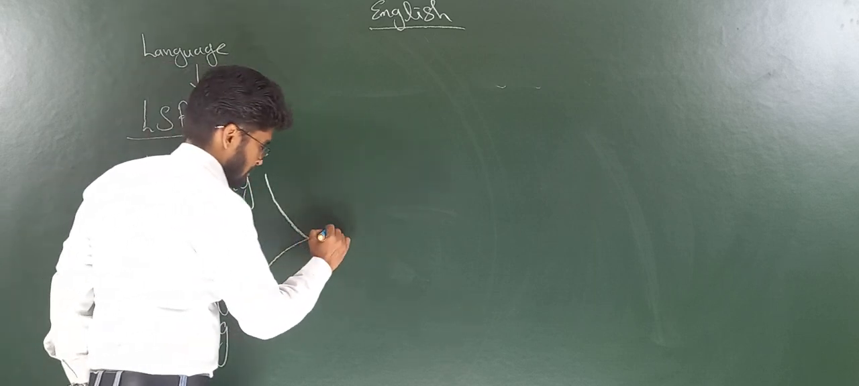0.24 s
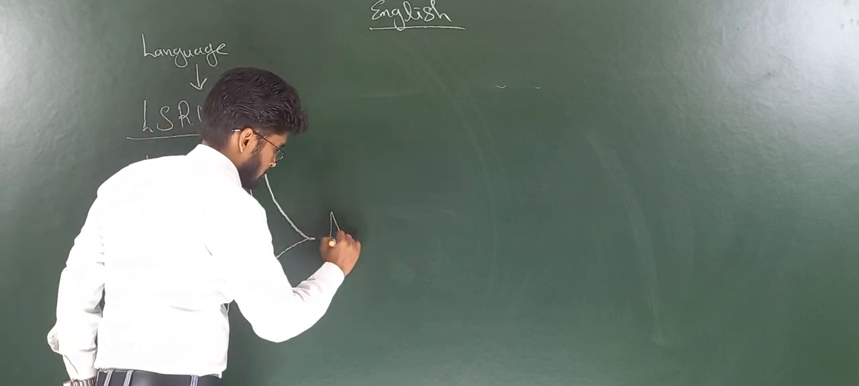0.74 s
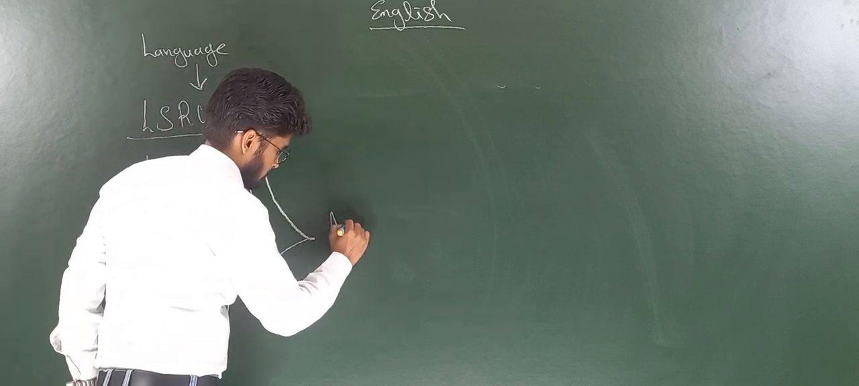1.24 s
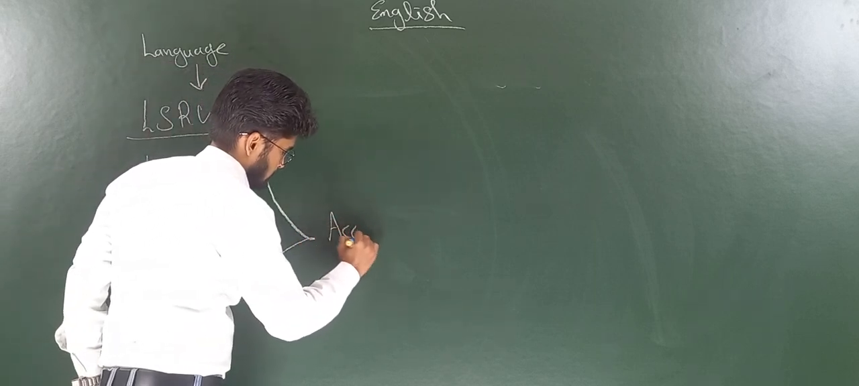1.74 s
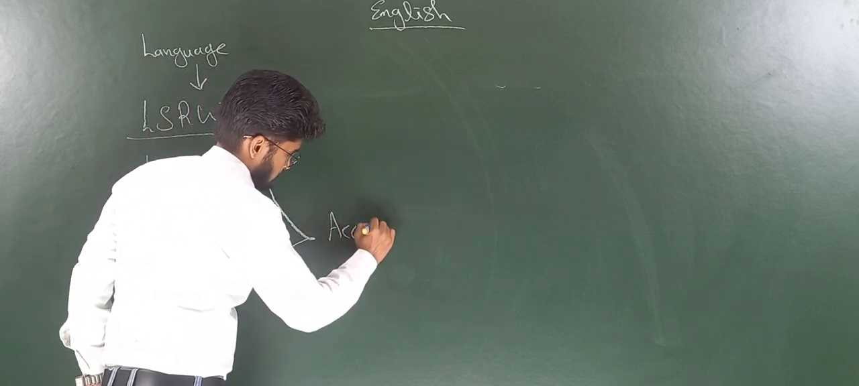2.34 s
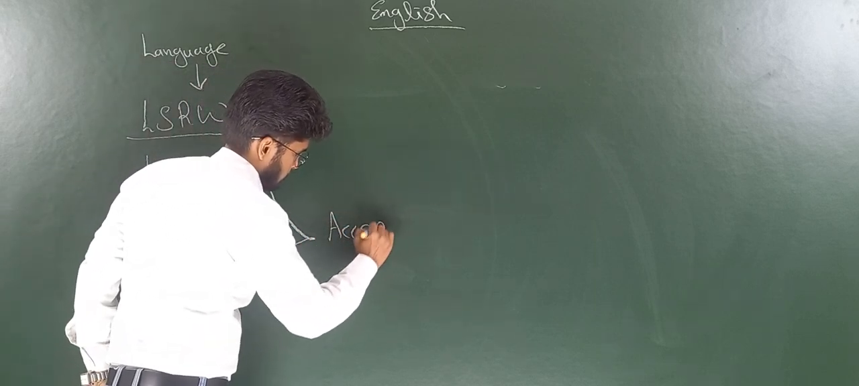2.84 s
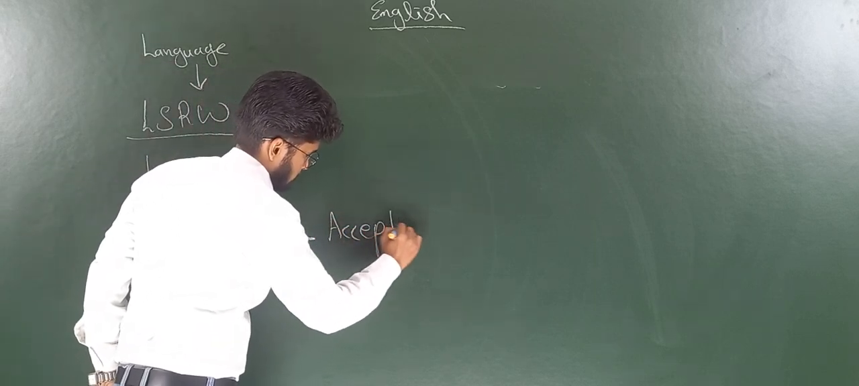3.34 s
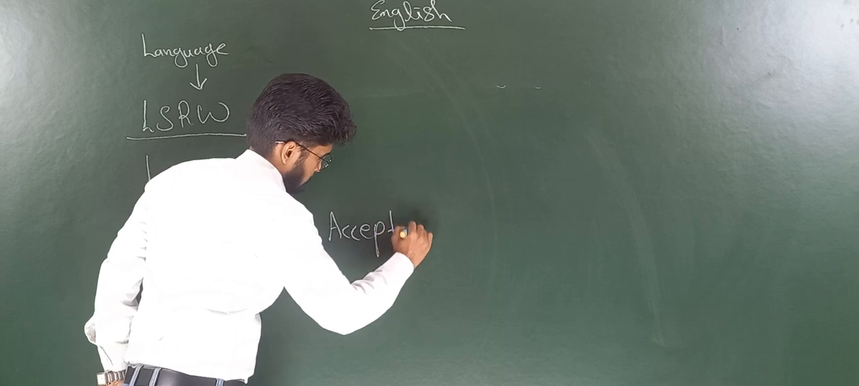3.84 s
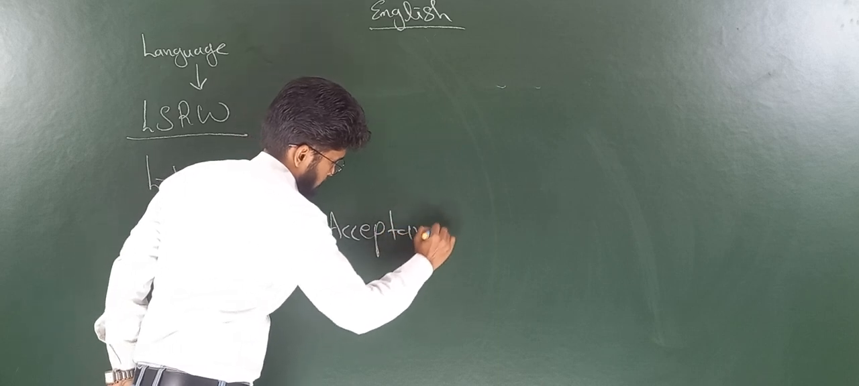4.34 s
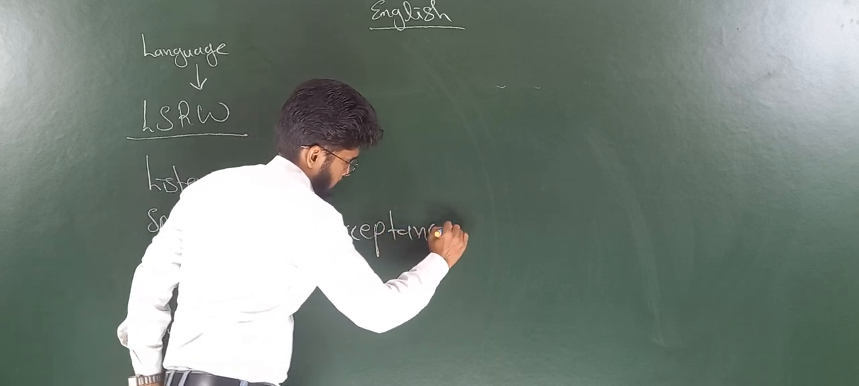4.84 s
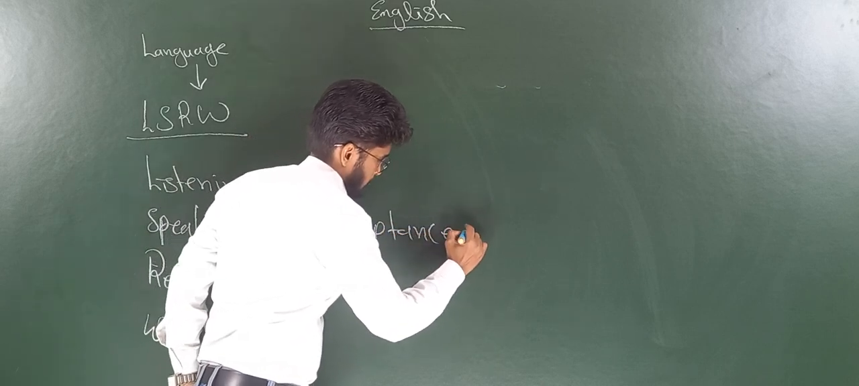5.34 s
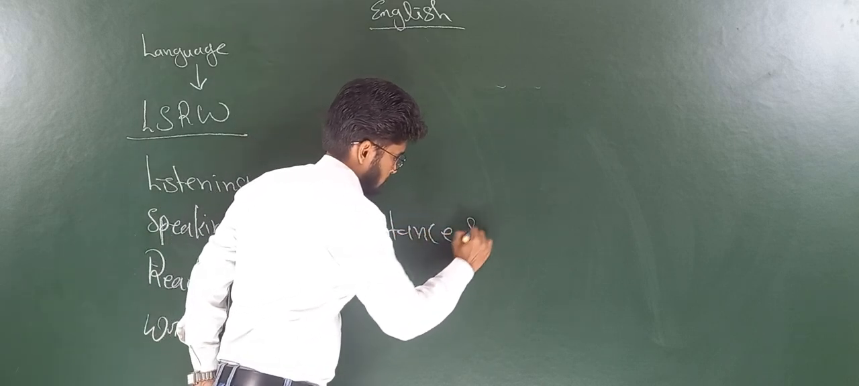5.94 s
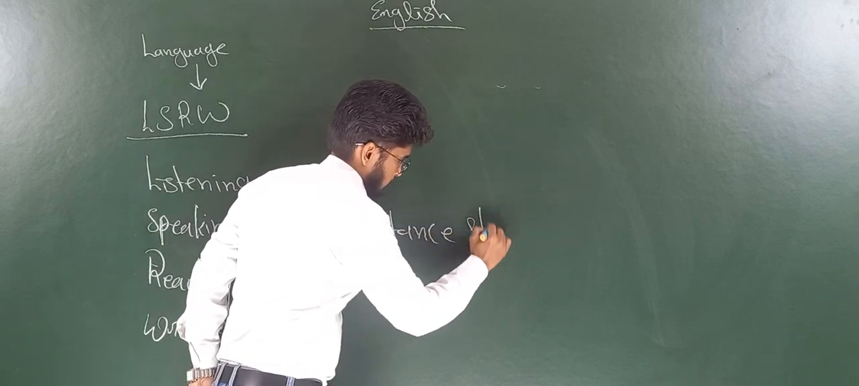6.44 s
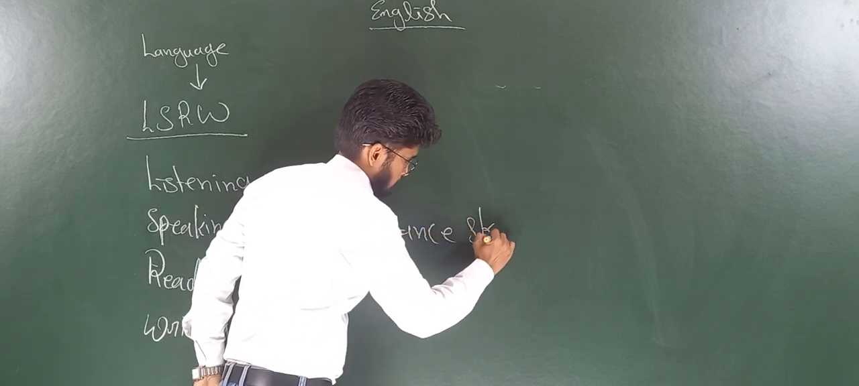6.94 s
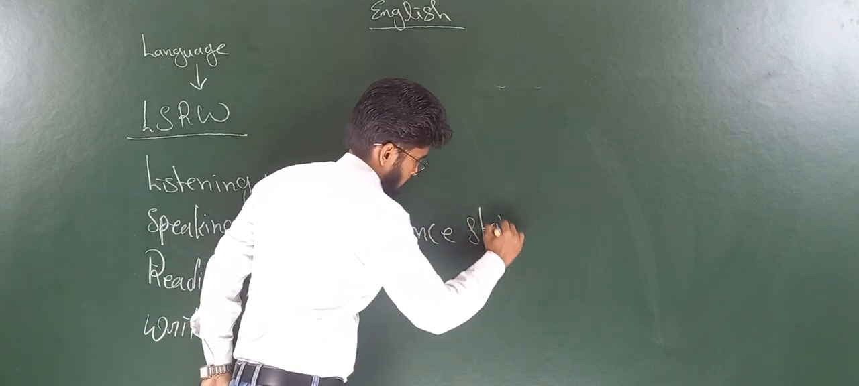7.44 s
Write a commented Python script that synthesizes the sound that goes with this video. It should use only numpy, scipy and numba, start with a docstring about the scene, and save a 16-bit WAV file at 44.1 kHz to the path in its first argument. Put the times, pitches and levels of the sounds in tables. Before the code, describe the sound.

A person writes with chalk on a big wall-mounted blackboard. Each landing gives a tiny bright tick and a hollow, low-mid knock that rings briefly, then short soft scratches follow as strokes are drawn. Taps come unevenly, with a scratch-only stretch around two to three seconds and louder knocks later. A bare classroom adds a short diffuse tail; faint rumble and microphone hiss lie underneath.

```python
"""Chalk writes a word on a large wall-mounted blackboard in a quiet, bare-walled classroom.
Throughout: low wavering rumble and faint hiss, both filtered noise. Each letter starts with a knock:
stick tick, panel swing, decaying modes and a late bass boom. Short strokes follow: random grain impulses,
filtered, hiss at the tip, ring the stick and make the board drone; some judder around one pitch.
Towards the end of the word the knocks' ringing changes colour, as the panel modes shift with the hand."""
import sys
import numpy as np
from scipy import signal
from scipy.fft import rfft, irfft
from scipy.io import wavfile
from numba import njit

SR = 44100
rng = np.random.default_rng(int(sys.argv[2]) if len(sys.argv) > 2 else 0)


def wrap_up_sound(samples):
    """Save the sound to the file named by the first command line argument, as 16-bit audio."""
    columns = np.atleast_2d(samples).T
    # keep every value between -1 and 1, then stretch to whole-number steps
    tamed = np.clip(columns, -1, 1)
    steps = np.round(tamed * 32767).astype(np.int16)
    wavfile.write(sys.argv[1], SR, steps)


N = 339570
T = np.arange(N) / SR
T_1S = T[:SR]


def undb(db):
    """Decibels to gain."""
    return 10 ** (np.asarray(db) / 20)


def unit(x):
    """Scale to rms 1."""
    return x / np.sqrt(np.mean(x ** 2))


def lookup(hz, points):
    """Read (f/Hz, value) points on a log-frequency axis."""
    f, v = np.transpose(points)
    return np.interp(np.log(np.maximum(hz, 1)), np.log(f), v)


def colour(x, points):
    """Minimum-phase filter with the given (f/Hz, level/dB) shape, via the folded cepstrum."""
    size = 4096
    level_db = lookup(np.arange(size // 2 + 1) * SR / size, points)
    cepstrum = irfft(np.log(undb(level_db)))
    cepstrum[1:size // 2] *= 2
    cepstrum[size // 2 + 1:] = 0
    impulse = irfft(np.exp(rfft(cepstrum)))
    return signal.fftconvolve(x, impulse)[:len(x)]


def soften(x, hz):
    """Low-pass: a softer contact pushes for longer and loses the top."""
    return signal.sosfilt(signal.butter(2, hz, fs=SR, output="sos"), x)


def fade(t60_s):
    """One second of exponential decay, -60 dB at t60_s."""
    return np.exp(-np.log(1000) * T_1S / t60_s)


def dense_ring(noise, t60s):
    """Countless overlapping modes: one second of noise whose octaves die away at their own rates."""
    spectrum = rfft(noise)
    octave = np.log2(np.maximum(np.arange(SR // 2 + 1), 1))
    ring = np.zeros(SR)
    for k in range(4, 16):
        weight = np.maximum(1 - abs(octave - k), 0)
        ring += irfft(spectrum * weight, SR) * fade(lookup(2 ** k, t60s))
    return ring


def walk(rate_hz):
    """Smooth random wander with a spread near 1."""
    points = rng.standard_normal(N // 10)
    return np.interp(T * rate_hz, np.arange(len(points)), points)


def add(out, s, x):
    """Mix x in at time s."""
    i = int(s * SR)
    out[i:i + len(x)] += x[:N - i]


@njit
def resonate(x, hz, width_hz):
    """State-variable band-pass with a moving centre."""
    y, b, l = np.empty(len(x)), 0., 0.
    for i in range(len(x)):
        g, k = np.tan(np.pi * hz[i] / SR), width_hz / hz[i]
        v = (b + g * (x[i] - l)) / (1 + g * (g + k))
        b, l, y[i] = 2 * v - b, l + 2 * g * v, k * v
    return y


def band(x, hz, width_hz):
    """A steep resonance, fixed or moving, at rms 1."""
    centre_hz = hz * np.ones(N)
    return unit(resonate(resonate(x, centre_hz, width_hz), centre_hz, width_hz))


# hand at start, middle, end of word: [t/s]
PLACE_S = [1.56, 4.95, 6.35]
# strong panel modes: [f/Hz, t60/s, level/dB struck at start, middle, end of word]
PANEL_MODES = [(73.1, 0.43, -36, -32, -76), (93.4, 0.26, -30.5, -40, -14), (170.5, 0.53, -29, -48, -16.5),
               (279.6, 0.73, -28.5, -40, -64), (296.2, 0.39, -18, -74, -12.5), (368, 0.27, -33, -30, -44),
               (362.5, 0.062, -4, -4, -5), (474.3, 0.15, -18, -11, -18), (514, 0.062, -23, -8.5, -21.5),
               (634, 0.37, -37.5, -62, -15.5), (655, 0.082, -57, -22.5, -15.5),
               (704, 0.23, -67, -47, -13.5), (1370, 0.021, -33, -9, -34)]


def panel_modes(s):
    """Decaying cosines, levels set by where the hand is at time s."""
    ring = np.zeros(SR)
    for hz, t60_s, *place_db in PANEL_MODES:
        level_db = np.interp(s, PLACE_S, place_db)
        ring += undb(level_db) * fade(t60_s) * np.cos(2 * np.pi * hz * T_1S)
    return ring


# first-swing spectrum: [f/Hz, level/dB]
KNOCK_SPECTRUM = [(40, -28.5), (150, -9.5), (300, -8.5), (500, 7.5), (1200, -1), (1480, -10), (1900, -20.5),
                  (6000, -75.5)]


def panel_knock(contact_hz):
    """First sharp swing of the panel, softened by the contact, at peak 1."""
    swing = soften(colour(signal.unit_impulse(SR), KNOCK_SPECTRUM), contact_hz)
    return swing / abs(swing).max()


# dense-ring spectrum: [f/Hz, level/dB]
RING_SPECTRUM = [(50, -46), (150, -5.5), (230, -7), (350, 3.5), (800, -1), (1380, -10), (1650, -14),
                 (2200, -24), (3200, -22), (4500, -39)]
# dense-ring decay: [f/Hz, t60/s]
RING_T60 = [(100, 0.51), (400, 0.67), (1000, 0.55), (3000, 0.27)]


def panel_ring(contact_hz, early_db=3, early_t60_s=0.032):
    """Edge returns: strongest before the waves have spread over the whole panel."""
    noise = colour(rng.standard_normal(SR), RING_SPECTRUM)
    ring = dense_ring(unit(soften(noise, contact_hz)), RING_T60)
    return ring * (1 + undb(early_db) * fade(early_t60_s))


# low-boom spectrum: [f/Hz, level/dB]
BOOM_SPECTRUM = [(25, -1), (50, -18), (80, 3), (105, -1), (150, 4.5), (800, -47)]


def panel_boom(rise_s=0.0031, t60_s=0.45):
    """Slow bending waves: the bass builds up late."""
    noise = unit(colour(rng.standard_normal(SR), BOOM_SPECTRUM))
    return noise * fade(t60_s) * (1 - np.exp(-T_1S / rise_s))


# stick-tick spectrum: [f/Hz, level/dB]
TICK_SPECTRUM = [(600, -60), (2000, 1), (3300, 15), (4600, 3), (8500, 7.5), (16000, -7)]


def stick_tick(t60_s=0.011):
    """Bright, fast-decaying noise of the stick."""
    return unit(colour(rng.standard_normal(SR), TICK_SPECTRUM)) * fade(t60_s)


# chalk landings: [t/s, ring level/dB, contact cut-off f/Hz, tick level/dB before tick_gain_db]
LANDINGS = [(0.3954, -47.5, 670, -59), (0.9023, -34, 1440, -53), (1.2972, -41.5, 1080, -63),
            (1.6297, -35.5, 1370, -52), (1.936, -33, 2570, -46.5), (3.0189, -38.5, 850, -53),
            (3.304, -36, 1260, -48), (3.9176, -32.5, 2040, -51), (4.4687, -31.5, 4500, -39),
            (4.6982, -38, 1390, -50), (5.4248, -66, 2420, -58.5), (5.6189, -37.5, 680, -51.5),
            (5.678, -41, 1000, -64), (6.1654, -29.5, 1220, -38.5), (6.6770, -34, 2180, -45),
            (7.129, -30.5, 2850, -41.5), (7.3826, -32.5, 1770, -47.5)]
# gain over ring level at start, middle, end of word: [level/dB]; thump before contact correction
KNOCK_OVER_RING_DB = [19.5, 16, 14]
THUMP_OVER_RING_DB = [20.5, 24, 12]
BOOM_OVER_RING_DB = [-14, -14.5, -9.5]


def taps(tick_gain_db=4, spread_s=0.0026, lead_s=0.00023, usual_contact_hz=1500, thump_db_per_octave=-3.5):
    """The stick ticks, the panel gives one sharp swing, then waves return from its edges and ring on."""
    out = np.zeros(N)
    spread = 1 - np.exp(-(T_1S / spread_s) ** 2)
    for s, ring_db, contact_hz, tick_db in LANDINGS:
        knock_db = ring_db + np.interp(s, PLACE_S, KNOCK_OVER_RING_DB)
        boom_db = ring_db + np.interp(s, PLACE_S, BOOM_OVER_RING_DB)
        # a harder, shorter contact puts less into the low modes
        contact_db = thump_db_per_octave * np.log2(contact_hz / usual_contact_hz)
        thump_db = ring_db + np.interp(s, PLACE_S, THUMP_OVER_RING_DB) + contact_db
        tick = undb(tick_db + tick_gain_db) * stick_tick()
        knock = undb(knock_db) * panel_knock(contact_hz)
        thump = undb(thump_db) * soften(panel_modes(s), contact_hz)
        ring = undb(ring_db) * panel_ring(contact_hz)
        boom = undb(boom_db) * panel_boom()
        add(out, s - lead_s, tick + knock + spread * (thump + ring) + boom)
    return out


def crumble(grains_per_s=9000):
    """Chalk grains break off at random: impulses of Gaussian size, mostly small with a few large."""
    hit = rng.random(N) < grains_per_s / SR
    return unit(hit * rng.standard_normal(N))


def stroke_speed(start_s, length_s, peak_share=0.57, edge_order=2.96):
    """Every stroke is the same gesture: the tip gathers speed, glides and brakes."""
    along = (T - start_s) / length_s - peak_share
    edge = np.where(along < 0, peak_share, 1 - peak_share)
    return np.exp(-np.minimum(abs(along / edge) ** edge_order, 20))


# tip-hiss spectrum: [f/Hz, level/dB]
HISS_SPECTRUM = [(1500, -33), (4400, -7), (6000, -4), (8500, -1), (10800, -2.5), (12500, -1), (16000, -3.5)]


def tip_hiss(grit, grip, stick_hz, vigour, stick_db=-1, stick_width_hz=740.0):
    """Grains hiss and ring the stick; gentle strokes sound duller than fast ones."""
    stick = unit(resonate(crumble() * grip, stick_hz, stick_width_hz))
    bright = unit(colour(grit, HISS_SPECTRUM)) + undb(stick_db) * stick
    dull = unit(soften(colour(crumble() * grip, HISS_SPECTRUM), 12000))
    return np.sqrt(vigour) * bright + np.sqrt(1 - vigour) * dull


# rasp spectrum: [f/Hz, level/dB]
RASP_SPECTRUM = [(600, -15), (1800, 1.5), (3200, -7), (4300, -9), (6000, -11), (16000, -38)]


def tip_rasp(grip, stick_hz, pressure, bend_db=-4, bend_width_hz=440.0, bite_hz=1770.0):
    """Hard pressure bites into the surface and wakes the stick's lowest bending mode."""
    bend_hz = stick_hz / 2.76
    bend = band(crumble() * grip, bend_hz, bend_width_hz)
    bite = band(crumble() * grip, bite_hz, bite_hz / 2)
    return unit(colour(crumble() * grip, RASP_SPECTRUM)) + pressure * (undb(bend_db) * bend + bite)


# board-drone spectrum: [f/Hz, level/dB]
DRONE_SPECTRUM = [(40, -20.5), (150, -18.5), (260, -4), (360, 4), (700, -1), (1250, -3), (1900, -20.5),
                  (3000, -24.5), (8000, -34)]


def board_drone(grit, modes_db=-7):
    """Grains shake the board; its mix of modes shifts as the hand travels along the word."""
    hum = np.zeros(N)
    for s, here in zip(PLACE_S, np.eye(len(PLACE_S))):
        ringing = unit(signal.fftconvolve(grit, panel_modes(s))[:N])
        hum += np.interp(T, PLACE_S, here) * ringing
    return unit(colour(grit, DRONE_SPECTRUM)) + undb(modes_db) * hum


def hand_echo(x, lag_s=0.000428, sway=0.24):
    """The fingers reflect the hiss and rasp; as they move, the notches of this short echo shift."""
    echo = np.interp(T - lag_s * (1 + sway * walk(9)), T, x)
    return x - .4 * echo


# chalk slides: [start t/s, length t/s, hiss level/dB before layer gains]
SLIDES = [(0.483, 0.12, -52.5), (0.649, .13, -57), (0.936, 0.042, -59.5), (1.355, 0.091, -62),
          (1.442, 0.064, -61), (1.677, 0.1, -62), (1.765, 0.068, -57.5), (1.963, 0.17, -68.5),
          (2.087, 0.22, -63), (2.283, 0.089, -61.5), (2.423, 0.13, -60.5), (2.579, 0.15, -58),
          (2.724, 0.17, -62), (3.085, 0.11, -54.5), (3.333, 0.066, -56.5), (3.438, 0.079, -64),
          (3.533, 0.11, -60), (3.716, 0.095, -61.5), (3.96, 0.087, -62), (4.077, 0.11, -63),
          (4.193, 0.16, -66.5), (4.486, .14, -58.5), (4.71, 0.2, -67), (4.864, 0.15, -62),
          (4.997, 0.087, -61.5), (5.626, 0.12, -62), (5.771, 0.086, -53), (5.854, 0.11, -64.5),
          (5.975, 0.038, -61.5), (6.223, 0.12, -57), (6.677, 0.15, -65), (6.831, 0.14, -63.5),
          (7.16, 0.09, -60.5), (7.423, 0.18, -65.5), (7.6, 0.18, -56.5)]
# rasp against hiss along the word: [t/s, level/dB]
COARSENESS_DB = [(0.5, -4.5), (1.8, -1), (2.4, 3), (3.3, -5), (4.15, 3.5), (5.0, 3), (6.3, 6.5), (6.9, 5.5),
                 (7.3, -0.5), (7.65, 2.5)]


def strokes(grip_db=1.5, slip_db=1.5, rasp_db=-2, hiss_db=-2, drone_db=11, drone_db_per_coarse_db=0.31,
            stick_ring_hz=9140, stick_drift=0.1):
    """Crumbling follows the speed of each stroke; it hisses, rings the stick and shakes the board."""
    power = sum((undb(db) * stroke_speed(start_s, length_s)) ** 2 for start_s, length_s, db in SLIDES)
    hiss = np.sqrt(power)
    coarse_db = np.interp(T, *np.transpose(COARSENESS_DB))
    rasp = hiss * undb(coarse_db)
    drone = hiss * undb(drone_db + drone_db_per_coarse_db * coarse_db)
    # the stick's ring wanders smoothly in pitch
    drift = stick_drift * walk(11) + 0.032 * walk(25)
    stick_hz = np.clip(stick_ring_hz * (1 + drift), 1000, SR / 2.5)
    # the tip grips and slips unevenly
    grip = undb(grip_db * walk(45) + slip_db * walk(350))
    grit = crumble() * grip
    hissing = undb(hiss_db) * hiss * tip_hiss(grit, grip, stick_hz, hiss / hiss.max())
    rasping = undb(rasp_db) * rasp * tip_rasp(grip, stick_hz, rasp / rasp.max())
    return drone * board_drone(grit) + hand_echo(rasping + hissing)


def bell(s, rise_s, fall_s):
    """A short swell that peaks at time s."""
    side_s = np.where(T < s, rise_s, fall_s)
    return np.exp(-np.minimum(abs((T - s) / side_s) ** 2.6, 20))


# chalk judders: [t/s, rise t/s, fall t/s, pitch f/Hz, level/dB]
JUDDER_EVENTS = [(2.285, 0.044, 0.059, 358, -42), (2.68, 0.016, 0.041, 343, -52),
                 (4.916, 0.0083, 0.05, 169, -40.5), (5.068, 0.023, 0.016, 417, -43.5),
                 (6.299, 0.012, 0.01, 3370, -50)]


def judders(width_share=0.53):
    """Where the chalk drags harder, the panel hums or the stick chatters briefly around one pitch."""
    out = np.zeros(N)
    for s, rise_s, fall_s, hz, db in JUDDER_EVENTS:
        tone = band(rng.standard_normal(N), hz, width_share * hz)
        out += undb(db) * bell(s, rise_s, fall_s) * tone
    return out


# classroom decay: [f/Hz, t60/s]
CLASSROOM_T60 = [(300, 1), (3000, 0.72), (12000, 0.23)]


def classroom(x, wet_db=-11, delay_s=0.0078):
    """Bare walls send back a diffuse tail."""
    build_up = 1 - np.exp(-(T_1S / delay_s) ** 2)
    tail = dense_ring(rng.standard_normal(SR), CLASSROOM_T60) * build_up
    return x + undb(wet_db) * signal.fftconvolve(x, tail / np.linalg.norm(tail))[:N]


# rumble and microphone-hiss spectra: [f/Hz, level/dB]
RUMBLE_SPECTRUM = [(25, -32.5), (60, -15.5), (110, 4), (180, 5.5), (330, -2), (500, -14.5), (1000, -24),
                   (3000, -40), (8000, -56)]
MIC_HISS_SPECTRUM = [(2800, -8.5), (6000, 0.5), (16000, -5)]


def room_tone(rumble_db=-60, waver_db=-2, mic_hiss_db=-72.5):
    """A low, gently wavering rumble under faint, steady microphone hiss."""
    rumble = unit(colour(rng.standard_normal(N), RUMBLE_SPECTRUM))
    mic_hiss = unit(colour(rng.standard_normal(N), MIC_HISS_SPECTRUM))
    return undb(rumble_db + waver_db * walk(6.1)) * rumble + undb(mic_hiss_db) * mic_hiss


def scene():
    """Writing on the board, heard in the room."""
    writing = taps() + strokes() + judders()
    return (classroom(writing) + room_tone())[None]


def record(dry, bass_hz=45, top_hz=15900):
    """The recorder cuts the deepest bass and the top."""
    lean = signal.sosfilt(signal.butter(4, bass_hz, "high", fs=SR, output="sos"), dry)
    return signal.sosfilt(signal.ellip(10, .2, 70, top_hz, fs=SR, output="sos"), lean)


dry = scene()
out = record(dry)
wrap_up_sound(out)
```